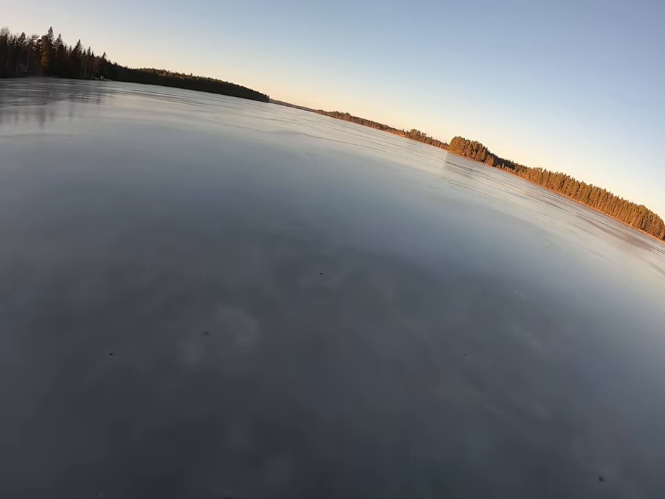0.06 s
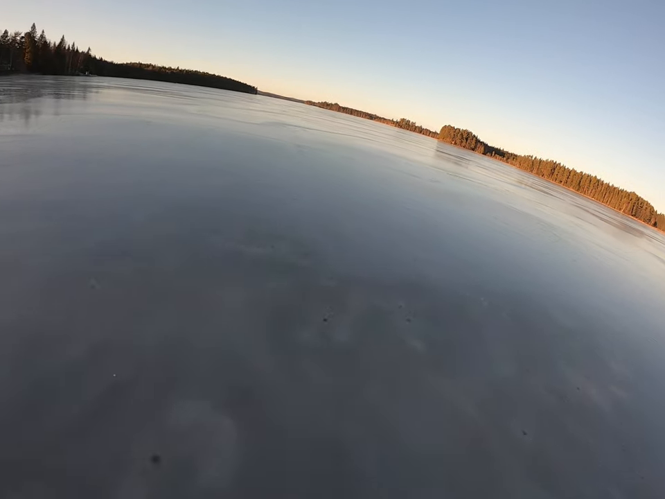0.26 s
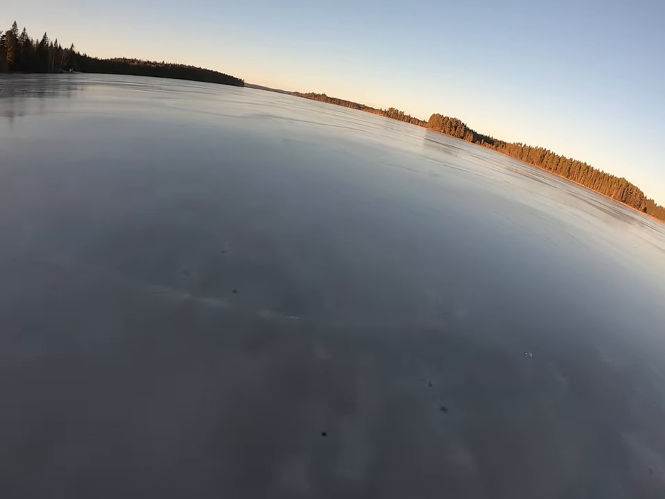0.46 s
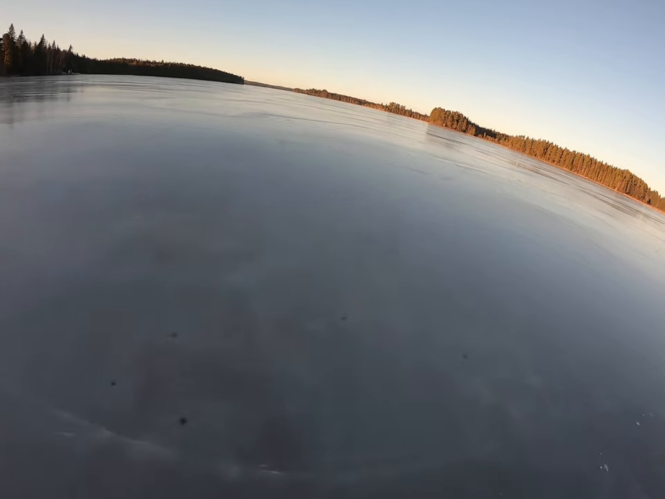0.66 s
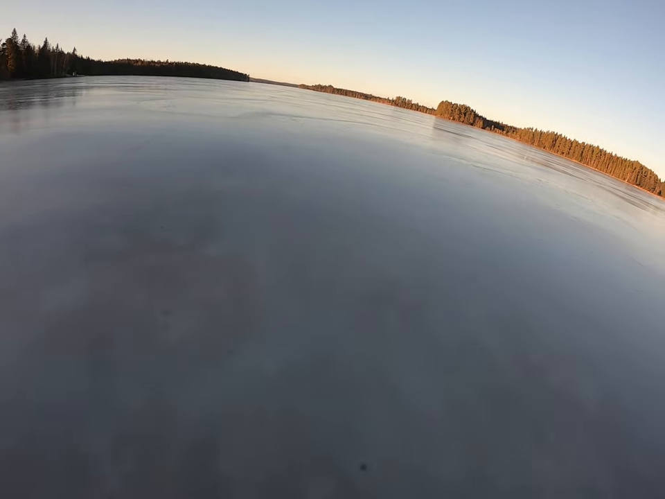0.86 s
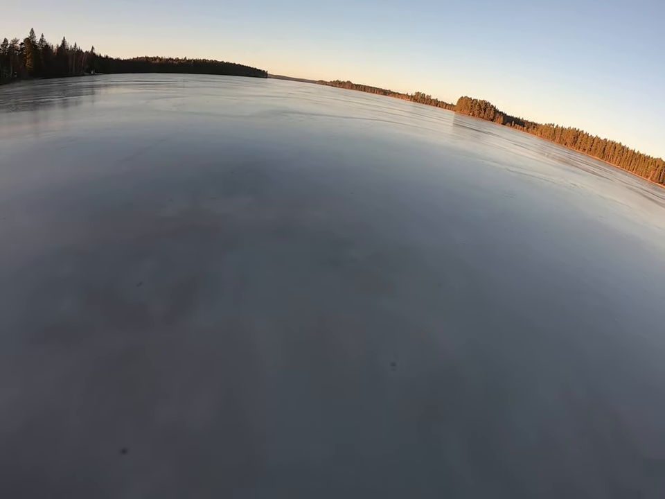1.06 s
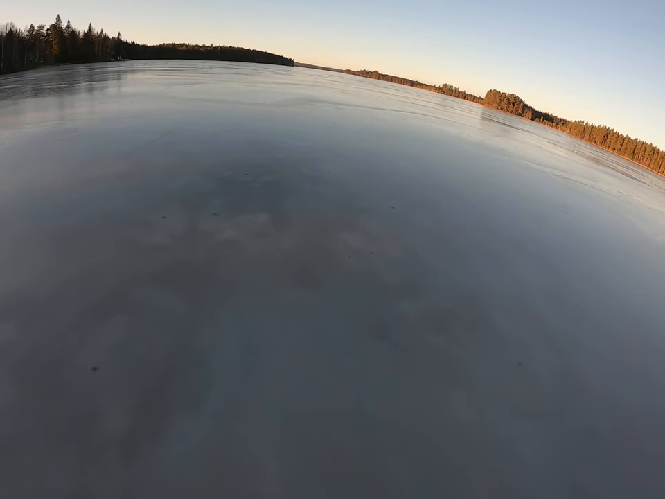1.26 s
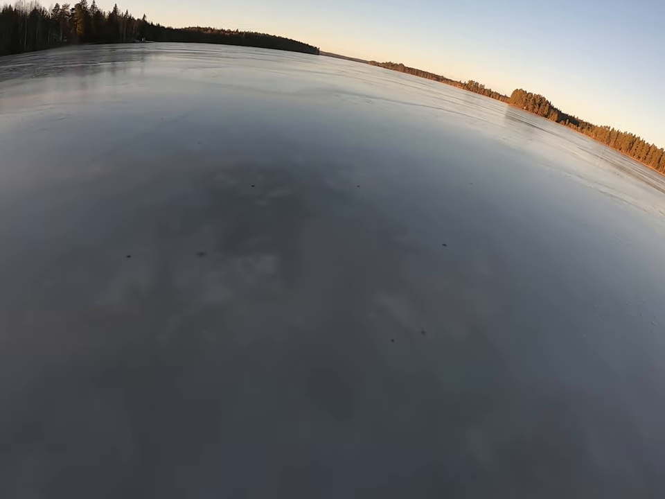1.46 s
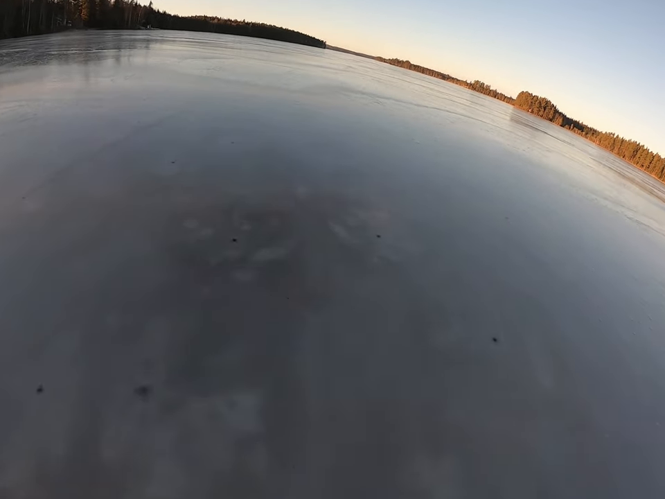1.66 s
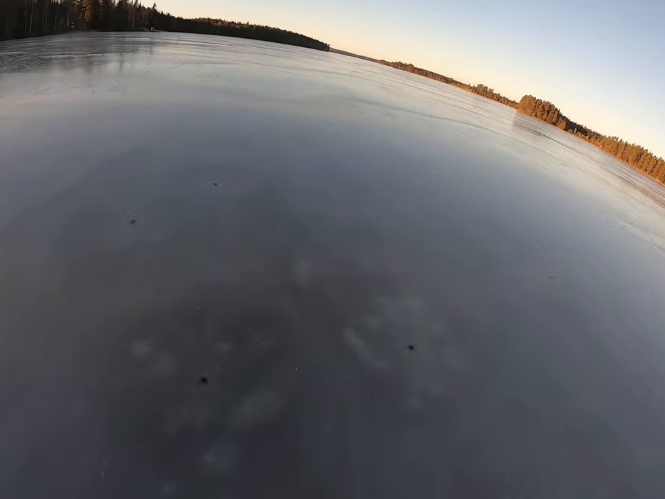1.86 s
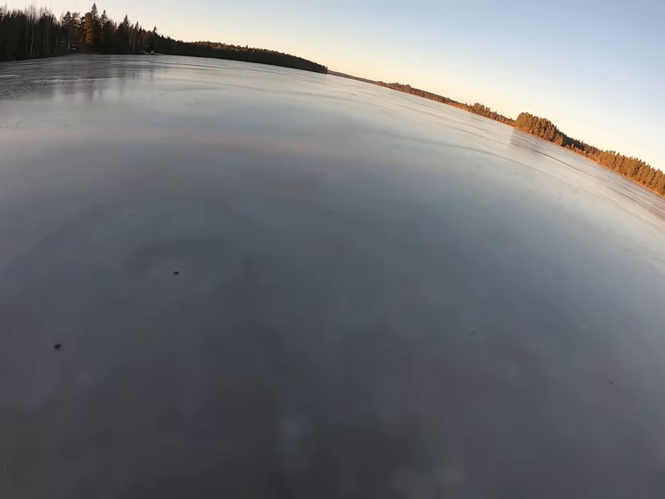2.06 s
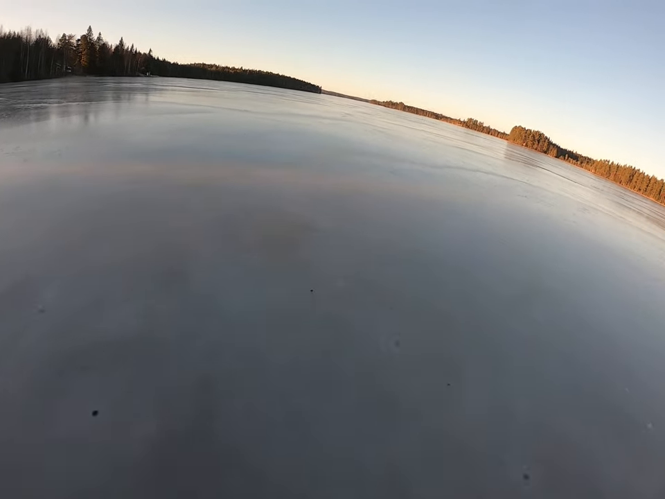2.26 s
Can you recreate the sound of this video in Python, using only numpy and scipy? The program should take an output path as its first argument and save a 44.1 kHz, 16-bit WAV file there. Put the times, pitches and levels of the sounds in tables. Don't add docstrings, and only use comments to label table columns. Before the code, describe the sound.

Two skating strokes on a frozen lake: sharp clacks, low grinding glides, rattling bindings and gusty wind

```python
import sys
import numpy as np
from scipy import signal
from scipy.fft import rfft, irfft, next_fast_len
from scipy.io import wavfile
from scipy.ndimage import map_coordinates

SR = 44100
rng = np.random.default_rng(int(sys.argv[2]) if len(sys.argv) > 2 else 0)


def pcm_store(signal):
    levels = np.round(np.clip(np.atleast_2d(signal), -1, 1) * 32767)
    wavfile.write(sys.argv[1], SR, levels.astype(np.int16).T)


def nominal_scale(level):
    x = np.asarray(level, float) / 20
    return 10 ** x


N = 102047

# [t/s, level/dB]
WIND_LEVEL = [
    (0, -37),
    (.3, -43),
    (.4, -40.5),
    (.75, -28.5),
    (1.0, -38),
    (1.35, -36.5),
    (1.55, -31),
    (1.9, -36.5),
    (2.31, -42),
]
# [f/Hz, level/dB]
BUFFET_SPECTRUM = [(15, -43), (30, 2), (55, 7), (110, 3), (220, -10), (500, -41)]
# [t/s, peak level/dB, f/Hz, t60/s]
ICE_CRACKLE = [(.27, -18, 3130, 0.055), (.272, -22.5, 8800, 0.015), (.374, -33, 6650, 0.029),
               (.41, -22, 3300, 0.049), (.43, -35, 3000, .04), (.4605, -19.5, 2310, 0.015),
               (.4925, -23, 2200, 0.016), (.5155, -21, 2370, 0.014), (.516, -32, 3830, 0.02),
               (.7125, -31, 7500, .02), (.765, -24.5, 1290, 0.025), (.855, -34, 3630, 0.022),
               (.958, -25, 2900, 0.021), (1.17, -48, 3030, .02), (1.218, -40, 6650, 0.052),
               (1.352, -30, 3180, 0.051), (1.362, -35, 8600, 0.017), (1.402, -51, 9400, 0.018),
               (1.42, -43, 9000, .04), (1.6, -26, 3020, 0.038), (1.632, -27, 3300, 0.036),
               (1.633, -23.5, 5950, 0.022), (1.646, -21.5, 3600, 0.033), (1.655, -35, 9500, 0.045),
               (1.66, -24, 2730, 0.036), (1.675, -33, 3000, .03), (1.801, -38.5, 3250, .02),
               (1.824, -31, 5000, 0.024), (1.843, -31, 4900, 0.033), (1.879, -29.5, 3040, 0.03),
               (1.885, -36, 5200, .02), (1.893, -40, 5030, .02), (1.897, -31.5, 2570, 0.054),
               (1.923, -31.5, 5160, 0.016), (1.973, -32, 5200, 0.014), (1.997, -35, 3000, 0.014),
               (2.006, -34, 2530, .02), (2.027, -29, 5100, 0.018), (2.065, -25.5, 3500, .04),
               (2.097, -29, 6200, .03), (2.104, -28.5, 3230, 0.039), (2.165, -27, 5300, 0.023),
               (2.214, -32, 5450, 0.017), (2.228, -23.5, 3150, .05), (2.246, -33, 3200, .04),
               (2.247, -34, 5300, 0.022), (2.287, -28.5, 5830, 0.016)]
# [t/s, peak level/dB]
SPRING_PINGS = [
    (1.255, -36.5),
    (1.266, -25),
    (1.2778, -25),
    (1.3284, -50),
    (1.338, -35),
    (1.348, -28.5),
    (1.3588, -24),
    (1.399, -43),
]
# [t/s, peak level/dB, f/Hz]
HARD_SNAPS = [(0.2362, -32, 3000), (0.2718, -9.5, 2080), (.3435, -14, 1700), (0.5726, -9.5, 2900),
              (0.6025, -21, 3830), (1.415, -24, 2500), (1.4865, -12, 2340), (1.5175, -19, 2600),
              (1.556, -18, 2500), (1.629, -10, 2370), (1.8285, -17.5, 1050), (2.1298, -20, 2570),
              (2.2248, -16.5, 1750), (.6655, -5, 3830), (1.268, -20.5, 2080), (1.278, -3.5, 2180),
              (1.361, -3, 2400)]
# [t/s, peak level/dB, f/Hz, t60/s]
FIRST_SETDOWN = [(0.0364, -18.5, 2300, 0.031), (0.0422, -27.5, 3440, 0.059), (0.0624, -31, 2030, 0.033),
                 (0.0689, -21.5, 2080, 0.044), (0.0843, -21.5, 2870, 0.029), (0.1169, -26.5, 2060, 0.028),
                 (0.1294, -30, 2060, 0.025), (0.1382, -22, 2030, 0.02), (0.1488, -21, 2570, 0.043),
                 (0.1535, -12.5, 2670, 0.013), (0.16, -17, 2090, 0.043), (0.1674, -32, 2800, 0.015),
                 (0.2364, -28.5, 2390, 0.019), (0.27, -8.5, 2010, 0.025), (0.342, -6.5, 1510, 0.03),
                 (0.3564, -18, 2500, 0.03), (0.3711, -4.5, 1470, 0.02), (0.3832, -8.5, 1310, 0.041),
                 (0.3905, -15.5, 3500, 0.035), (0.4067, -13, 1240, 0.061), (0.4228, -23, 2100, 0.015)]
# [t/s, peak level/dB, t60/s]
BINDING_TICKS = [(0.4802, -21, 0.0047), (0.514, -41, 0.018), (0.5387, -25, 0.013), (0.5724, -9.5, 0.024),
                 (0.599, -18, 0.022), (0.637, -23.5, 0.15), (0.6631, -10.5, 0.021), (0.71, -26, 0.086),
                 (0.7647, -20.5, 0.044), (0.786, -19, 0.047), (0.805, -24, 0.025), (0.8275, -21, 0.084),
                 (0.8735, -16.5, 0.033), (0.8986, -18.5, 0.022), (0.9132, -22, 0.028),
                 (0.9465, -22.5, 0.0088), (0.971, -26.5, 0.056), (0.9813, -13.5, 0.034),
                 (1.019, -27, 0.013), (1.077, -30, 0.027)]
# [t/s, peak level/dB, f/Hz, t60/s]
SECOND_CLACKS = [(1.279, -21.5, 2100, 0.027), (1.3625, -22.5, 2100, 0.031), (1.3984, -28, 3840, 0.031),
                 (1.4122, -22, 2260, 0.036), (1.4298, -23, 2410, 0.027), (1.4395, -24.5, 2530, 0.087),
                 (1.4586, -24, 2380, 0.082), (1.4702, -33, 2390, 0.065), (1.485, -16, 2330, 0.045),
                 (1.516, -18, 2070, 0.012), (1.537, -19, 2360, 0.0058), (1.5528, -19.5, 2200, 0.015),
                 (1.5837, -14, 2750, 0.011), (1.609, -19, 2150, 0.074), (1.6277, -11, 2460, 0.027),
                 (1.6426, -7.5, 1540, 0.04), (1.6467, -10, 1440, 0.026), (1.6984, -19, 2420, 0.026),
                 (1.709, -10, 2445, 0.038), (1.711, -10.5, 2530, 0.034), (1.73, -11.5, 2530, 0.018),
                 (1.824, -17, 2040, 0.046), (1.846, -21, 2450, 0.032), (1.952, -15.5, 2450, 0.026),
                  (1.969, -20, 2480, 0.013), (1.986, -20, 2630, 0.016), (2.025, -20, 2610, 0.03),
                  (2.053, -7, 2340, 0.029), (2.04, -34, 2360, 0.05), (2.096, -18, 1710, 0.029),
                  (2.126, -12, 2420, 0.045), (2.144, -21, 2100, 0.033), (2.173, -16, 1960, 0.044),
                  (2.177, -12, 1560, 0.02), (2.219, -16.5, 2000, 0.038), (2.226, -22, 1720, 0.046),
                  (2.286, -24, 2800, 0.034)]
# [f/Hz, bandwidth/Hz, level/dB]
SETDOWN_MODES = [(1400, 720, 1), (2374, 710, 4), (3500, 770, 0), (6080, 2100, -10.5)]
# [f/Hz, bandwidth/Hz, level/dB]
TICK_MODES = [(1050, 130, -3), (2380, 102, 5), (2900, 250, 4), (3840, 500, -9), (4540, 230, -1)]
# [f/Hz, bandwidth/Hz, level/dB]
SECOND_MODES = [(992, 150, 7), (2530, 665, 0), (3325, 65, 2.5), (4750, 1220, -17)]
# [t/s, level/dB, f/Hz]
CHIP_SPRAY = [(0, -48, 2640), (.16, -40.5, 2700), (.22, -47.5, 2620), (.33, -44, 2230), (.4, -31, 1880),
              (.5, -32.5, 2570), (.99, -39, 3800), (1.06, -41, 2000), (1.2, -44.5, 3170), (1.4, -48, 2650),
              (1.46, -39, 2360), (1.66, -35.5, 2160), (1.76, -39, 1710), (1.92, -43.5, 1400),
              (2.2, -40, 2380), (2.31, -39.5, 2710)]
# [f/Hz, level/dB]
CHIP_SPECTRUM = [(500, -15), (800, -5.5), (1400, -3), (2500, -11), (3800, -13.5), (5600, -15), (9500, -28),
                 (15000, -35)]
# [t/s, drone level/dB, edge level re drone/dB]
BLADE_LOAD = [(0, -30.5, -42), (.06, -54.5, -18), (.31, -46, -30), (.37, -30, -14), (.44, -28.5, 2.5),
              (.65, -31, 4), (.9, -27, -4), (1.0, -31, 2.5), (1.13, -29.5, 3), (1.18, -43, 1.5),
              (1.42, -44, -14.5), (1.47, -33.5, -2.5), (1.6, -26.5, -9), (2.05, -31, -25), (2.2, -27, 4),
              (2.255, -26.5, -6), (2.28, -52, -33)]
# [f/Hz, level/dB]
ICE_SPECTRUM = [(60, -11), (120, 0.5), (250, 0.5), (420, -8), (800, -34.5), (2000, -101)]
# [f/Hz, level/dB]
EDGE_SPECTRUM = [(150, 5.5), (400, 10.5), (650, 9), (1300, -4.5), (3000, -47)]
# [f/Hz, gain/dB]
HOUSING = [(4000, -2), (7500, -10), (9300, -4), (10800, -13.5), (15000, -35)]


def unit(x):
    return x / np.sqrt(np.mean(x ** 2) + 1e-20)


def along(points, hz):
    f, level_db = np.transpose(points)
    return nominal_scale(np.interp(np.log(hz + 1), np.log(f + 1), level_db))


def curves(rows):
    s, *columns = np.transpose(rows)
    return [np.interp(np.arange(N) / SR, s, column) for column in columns]


def wobble(rate):
    return map_coordinates(rng.standard_normal(2000), [np.arange(N) * rate / SR])


def filtered(x, response):
    n = x.shape[-1]
    m = next_fast_len(n + 8192)
    spectrum = rfft(x, m) * response(np.fft.rfftfreq(m, 1 / SR))
    return irfft(spectrum, m)[..., :n]


def ring(f, hz, width):
    damping = 1j * f * width
    return damping / (hz * hz - f * f + damping)


def rush(spectrum, rate, rough_db):
    noise = rng.standard_normal(N) * nominal_scale(rough_db * wobble(rate))
    return unit(filtered(noise, lambda f: along(spectrum, f)))


def wind():
    air = nominal_scale(-82) * rush(CHIP_SPECTRUM, rate=36, rough_db=-4)
    level_db, = curves(WIND_LEVEL)
    return nominal_scale(level_db) * rush(BUFFET_SPECTRUM, rate=19, rough_db=-3.0) + air


def clacks(events, modes, q, own_db):
    head_gain, head_share, rise_share = 1.8, .3, 0.049
    out, t = np.zeros(N + SR), np.arange(SR // 10) / SR
    jolts = rng.standard_normal((len(events), len(t)))

    def binding(f):
        return sum((-1) ** k * nominal_scale(g) * ring(f, c, w) for k, (c, w, g) in enumerate(modes))

    for (s, db, hz, t60), jolt in zip(events, jolts):
        tail = nominal_scale(-60 * t / t60)
        head = head_gain * nominal_scale(-60 * t / (head_share * t60))
        rise = (1 - np.exp(-t / (rise_share * t60))) ** 2
        jolt = jolt * (tail + head) * rise
        hit = filtered(jolt, lambda f: binding(f) + nominal_scale(own_db) * ring(f, hz, hz / q) ** 2)
        out[round(s * SR):][:len(t)] += nominal_scale(db) * hit / np.abs(hit).max()
    return out[:N]


def crackle():
    return clacks(ICE_CRACKLE, SECOND_MODES, q=3.9, own_db=31.5)


def spring():
    ping_hz, rise_s, t60 = 4080, .003, .018
    out, t = np.zeros(N + SR), np.arange(SR // 10) / SR
    shape = (1 - np.exp(-t / rise_s)) ** 2 * nominal_scale(-60 * t / t60)
    turns = rng.random(len(SPRING_PINGS))
    for (s, db), turn in zip(SPRING_PINGS, turns):
        ping = shape / shape.max() * np.sin(2 * np.pi * (ping_hz * t + turn))
        out[round(s * SR):][:len(t)] += nominal_scale(db) * ping
    return out[:N]


def snaps():
    q = 1.54
    out = np.zeros(N + SR)
    blow = np.arange(SR // 50) == 0
    for s, db, hz in HARD_SNAPS:
        hit = filtered(blow, lambda f: ring(f, hz, hz / q) ** 3)
        out[round(s * SR):][:len(hit)] += nominal_scale(db) * hit / np.abs(hit).max()
    return out[:N]


def first_binding():
    tick_hz = 3700
    ticks = [(s, db, tick_hz, t60) for s, db, t60 in BINDING_TICKS]
    setdown = clacks(FIRST_SETDOWN, SETDOWN_MODES, q=3.26, own_db=6.0)
    return setdown + clacks(ticks, TICK_MODES, q=4.6, own_db=3.5)


def second_binding():
    return clacks(SECOND_CLACKS, SECOND_MODES, q=4.6, own_db=12.5)


def spray():
    rasp_db, rasp_octaves = 9, .33
    clump_db, surge_db = 2.2, .6
    level_db, hz = curves(CHIP_SPRAY)
    f, t, z = signal.stft(rush(CHIP_SPECTRUM, rate=700, rough_db=2.6), SR, nperseg=256)
    centre = np.interp(t, np.arange(N) / SR, hz)
    octaves = np.log2((f[:, None] + 1) / centre)
    z = z * nominal_scale(rasp_db * np.exp(-.5 * (octaves / rasp_octaves) ** 2))
    hiss = unit(signal.istft(z, SR, nperseg=256)[1][:N])
    return nominal_scale(level_db + clump_db * wobble(120) + surge_db * wobble(18)) * hiss


def glide():
    load_db, bite_db = curves(BLADE_LOAD)
    drone = rush(ICE_SPECTRUM, rate=40, rough_db=1.6)
    pressure = nominal_scale(load_db + 0.92 * wobble(16))
    grind = nominal_scale(bite_db) * rush(EDGE_SPECTRUM, rate=60, rough_db=1.7)
    return pressure * (drone + grind)


def scene():
    blade_and_wind = glide() + spray() + wind()
    first = first_binding()
    second = second_binding() + snaps() + spring()
    return (blade_and_wind + first + second + crackle())[None]


def low_pass(x):
    return signal.sosfilt(signal.butter(12, 15600, fs=SR, output="sos"), x)


def record(dry):
    mix = filtered(dry, lambda f: along(HOUSING, f) * (f < 15500))
    return low_pass(mix)


dry = scene()
out = record(dry)
pcm_store(out)
```